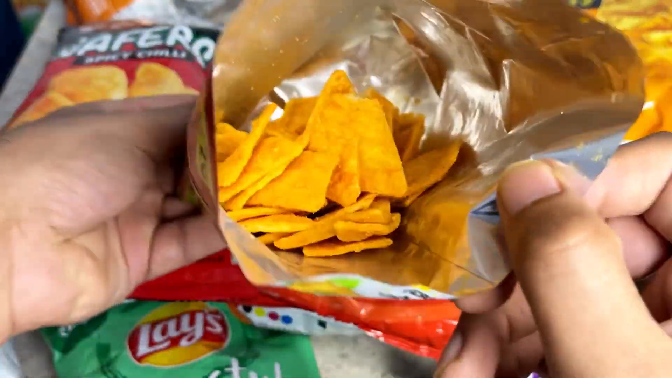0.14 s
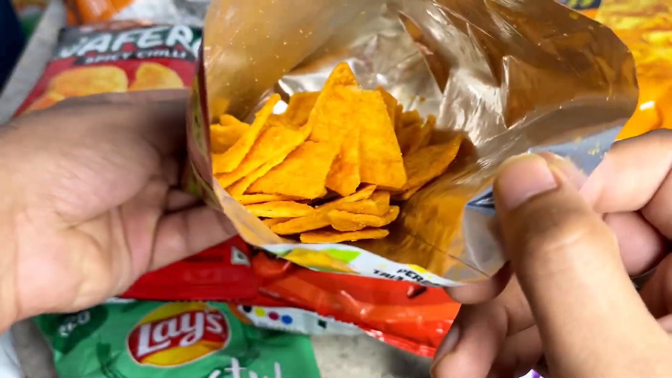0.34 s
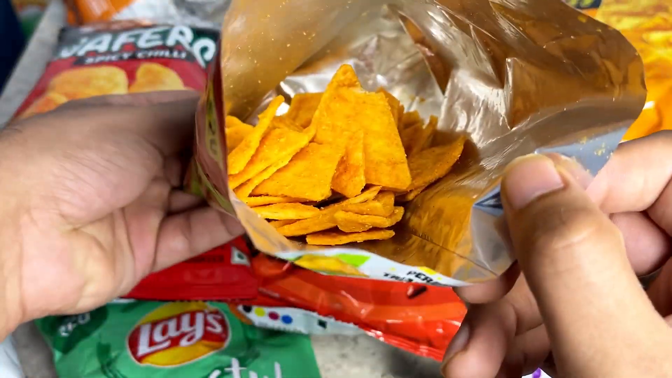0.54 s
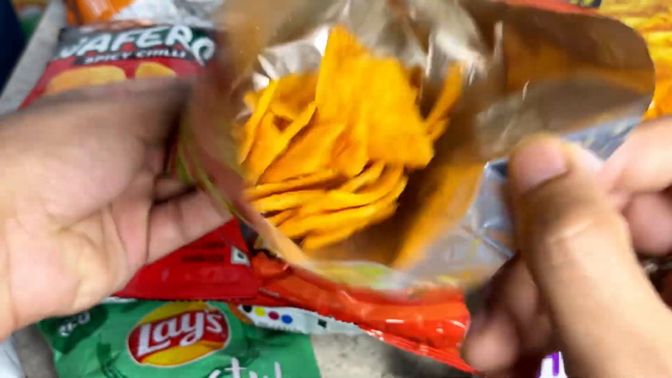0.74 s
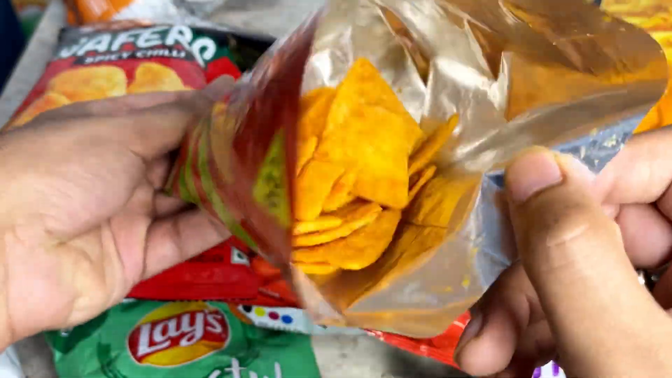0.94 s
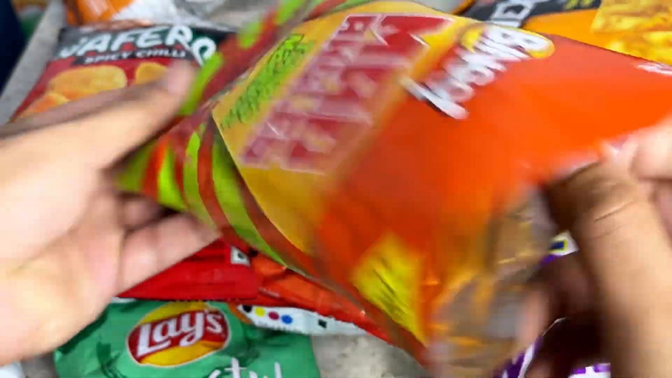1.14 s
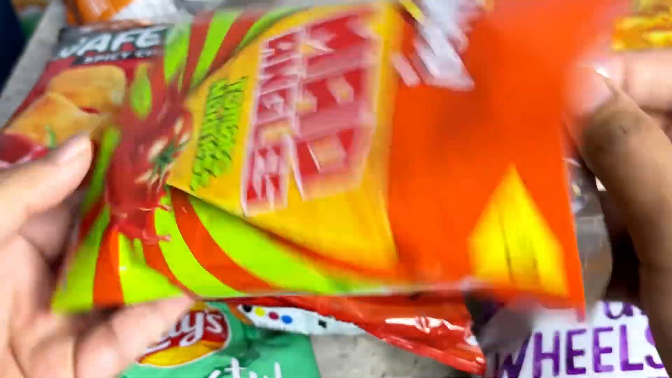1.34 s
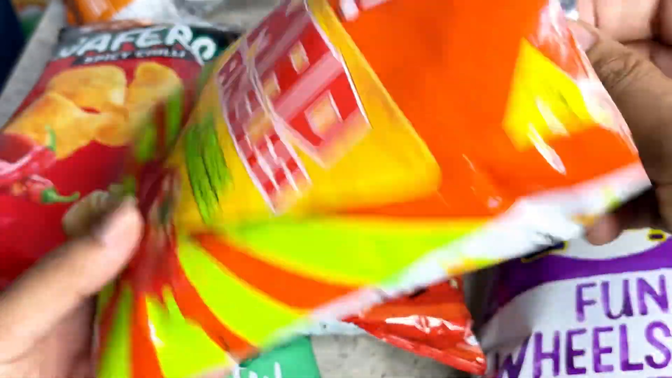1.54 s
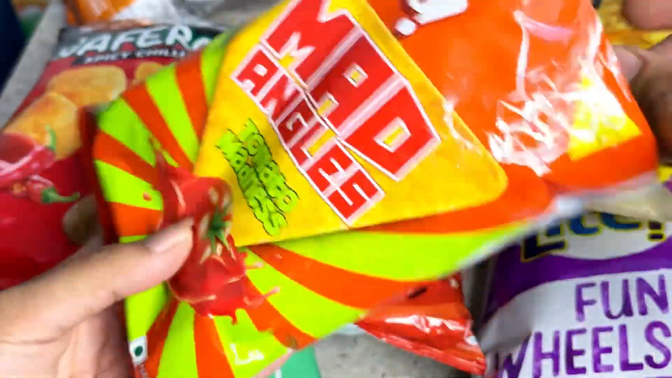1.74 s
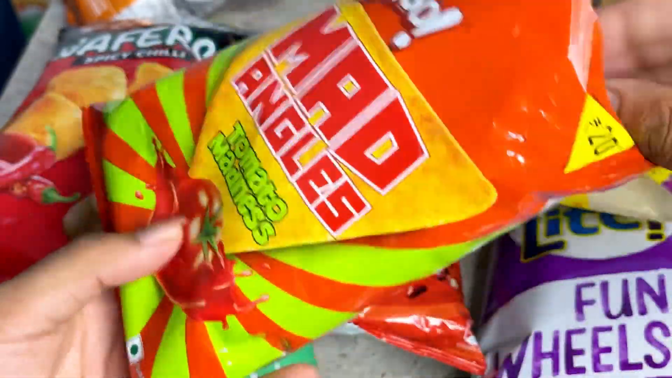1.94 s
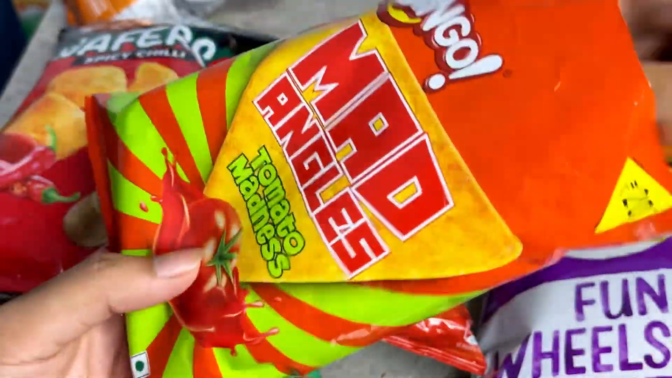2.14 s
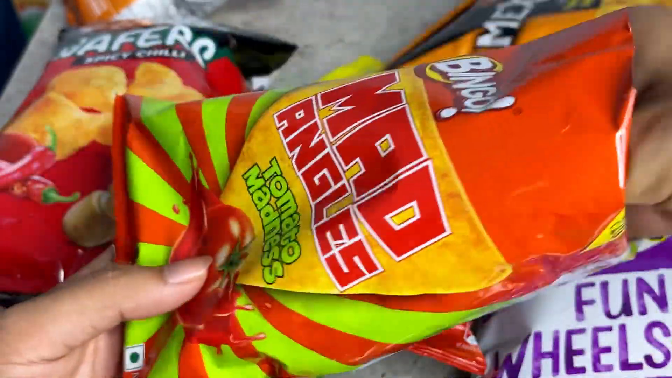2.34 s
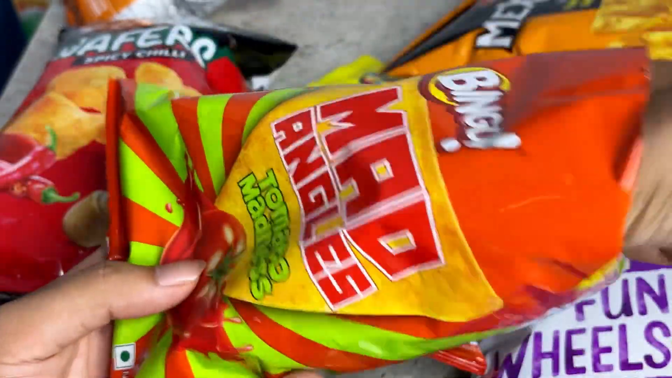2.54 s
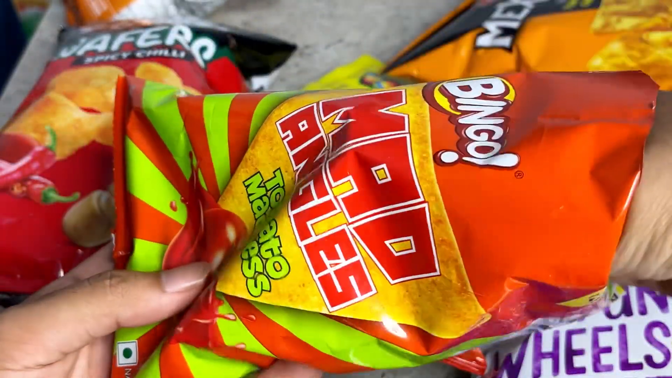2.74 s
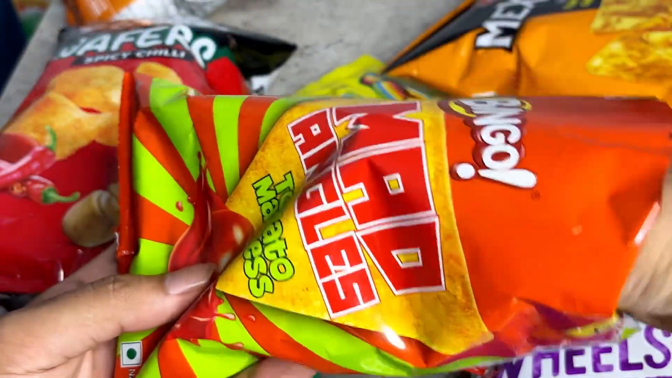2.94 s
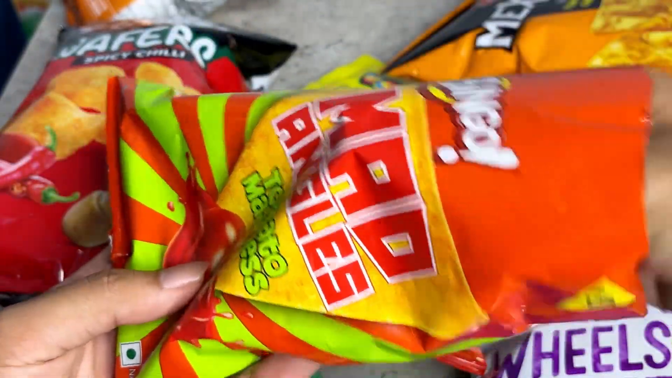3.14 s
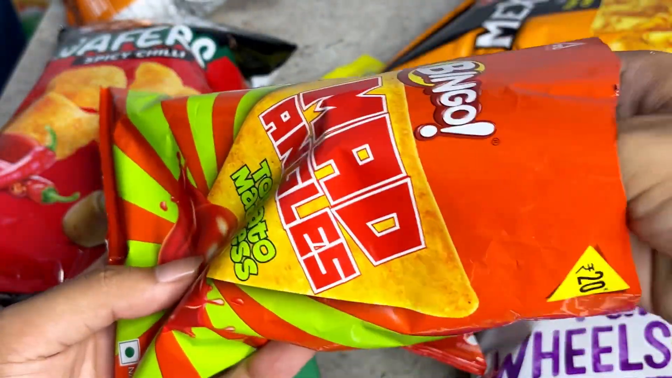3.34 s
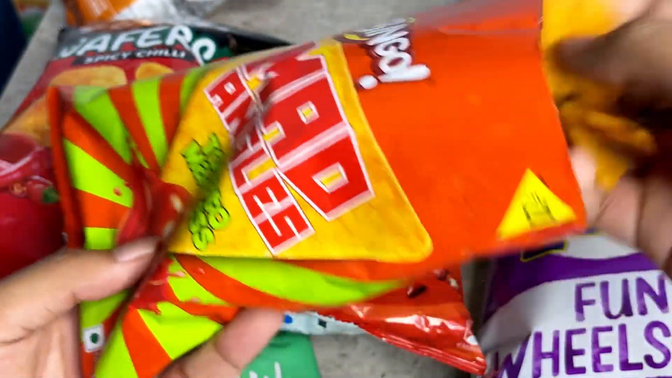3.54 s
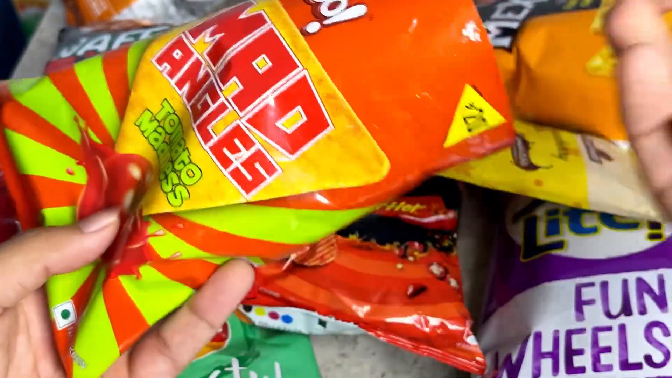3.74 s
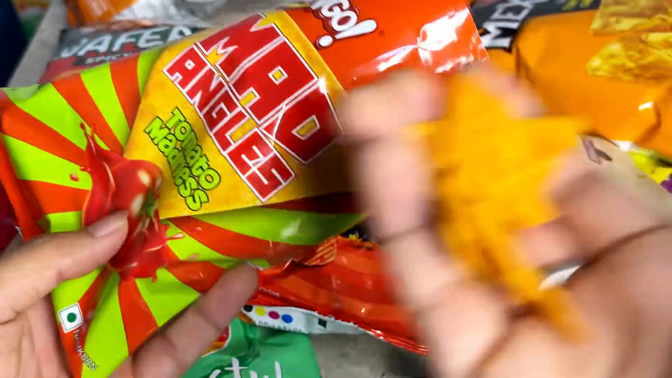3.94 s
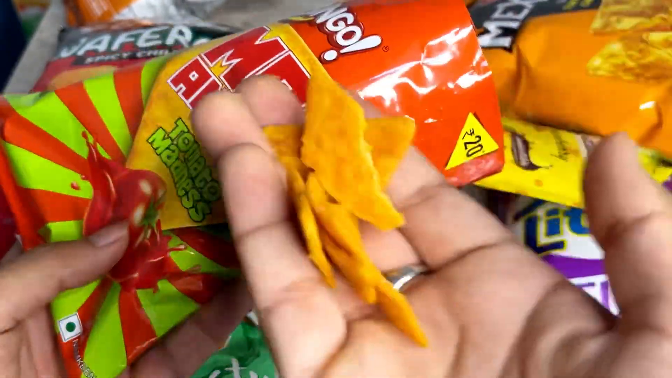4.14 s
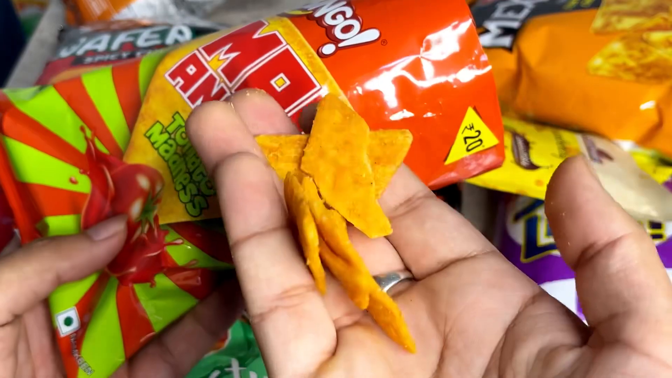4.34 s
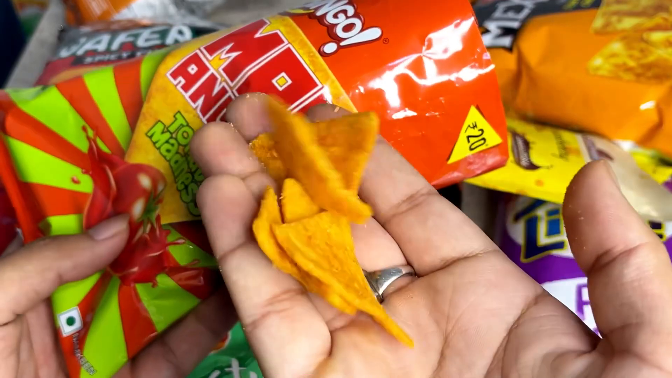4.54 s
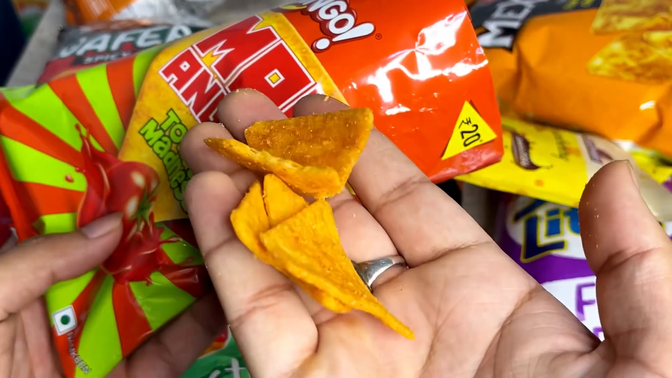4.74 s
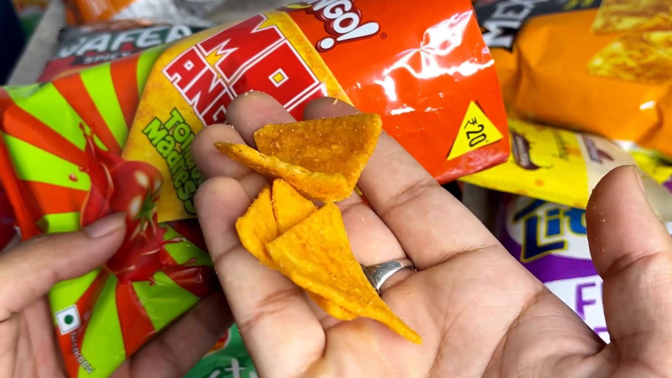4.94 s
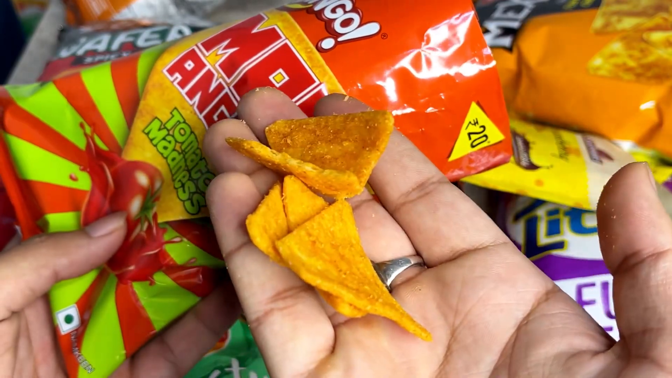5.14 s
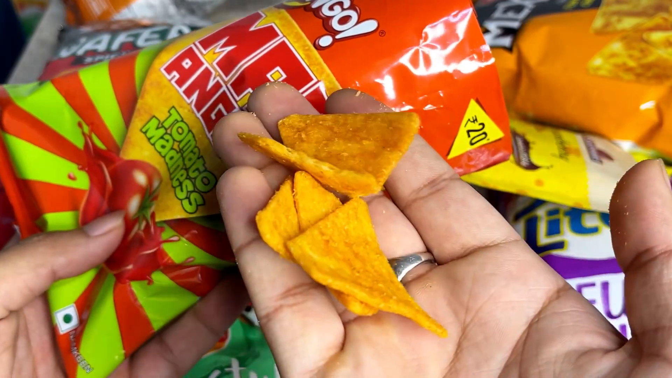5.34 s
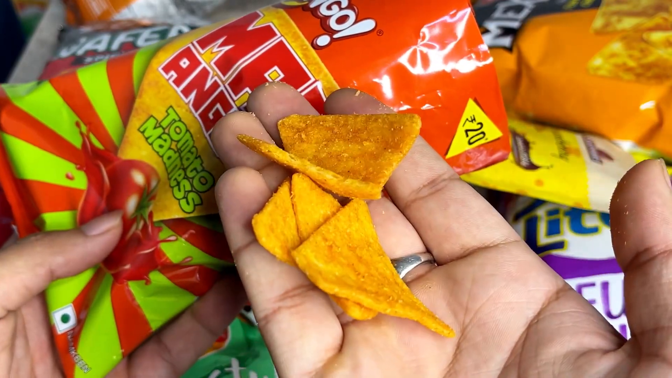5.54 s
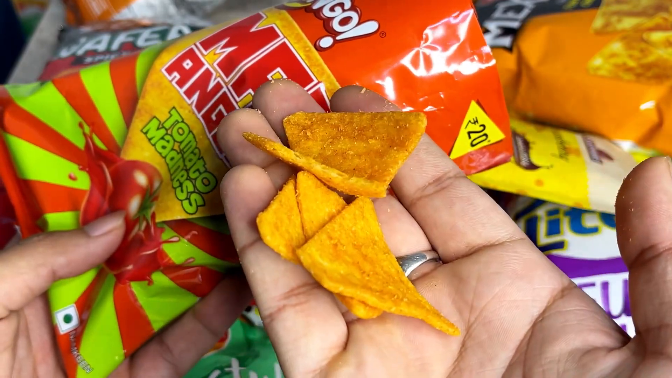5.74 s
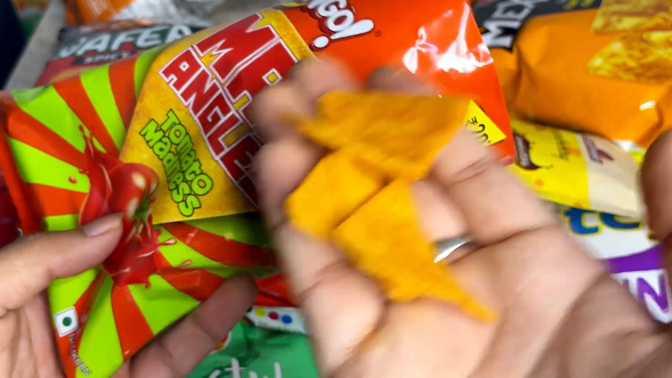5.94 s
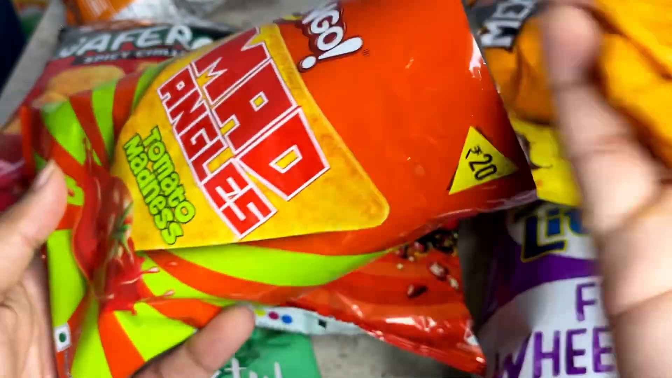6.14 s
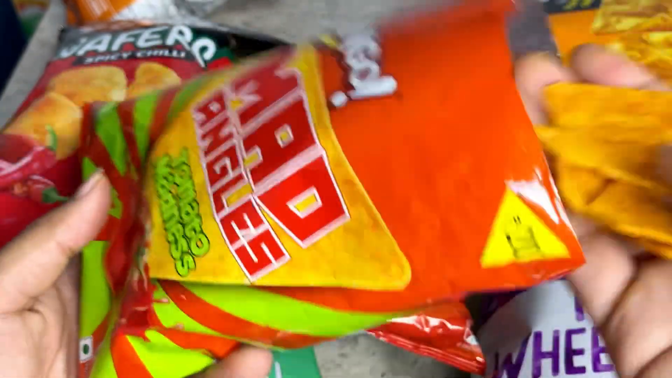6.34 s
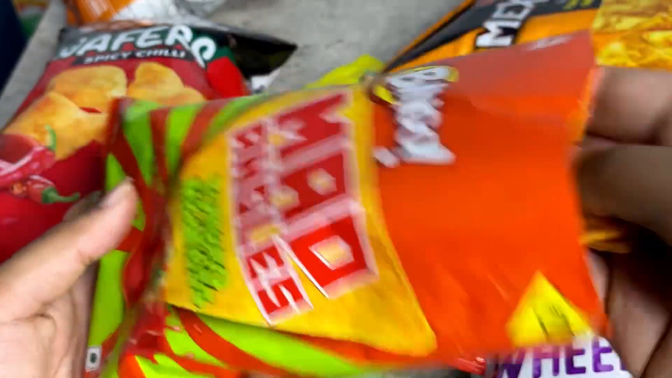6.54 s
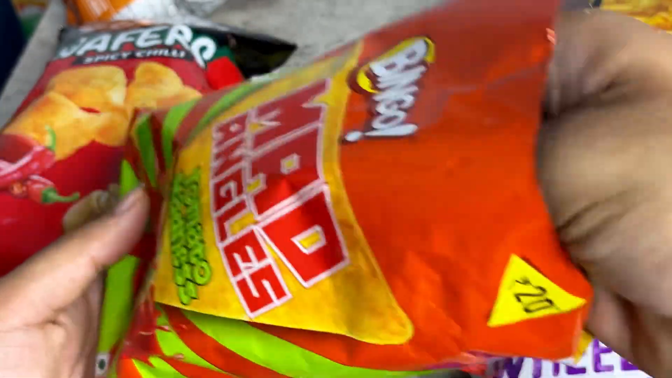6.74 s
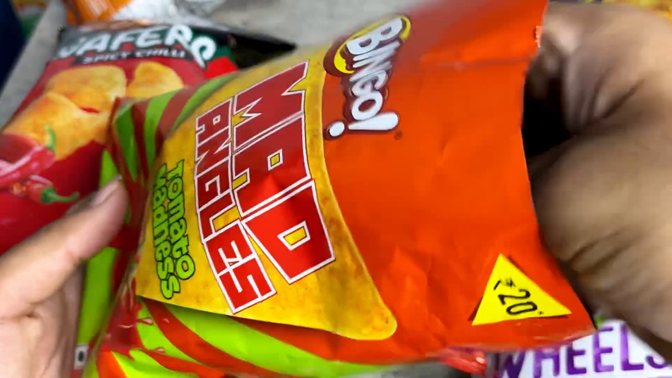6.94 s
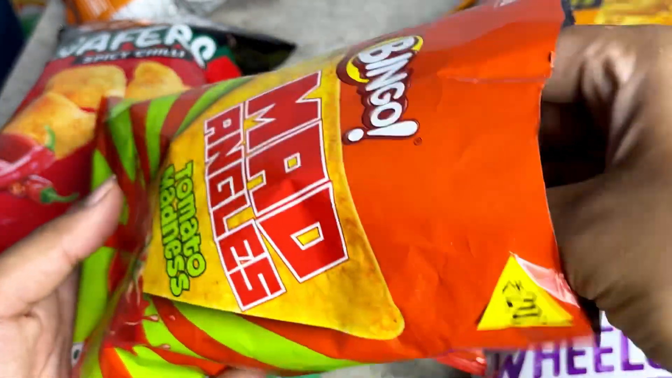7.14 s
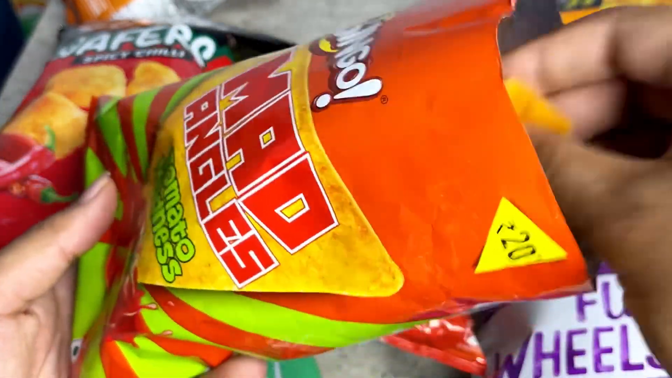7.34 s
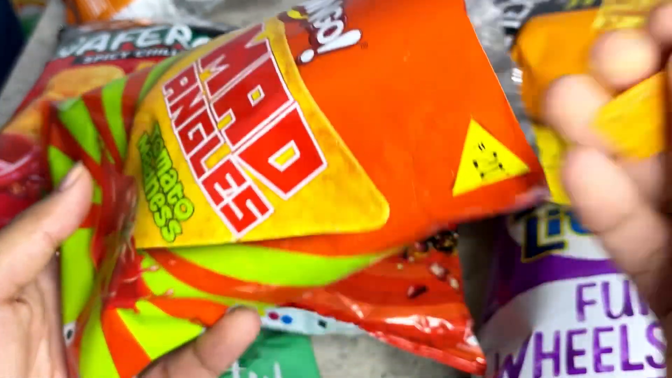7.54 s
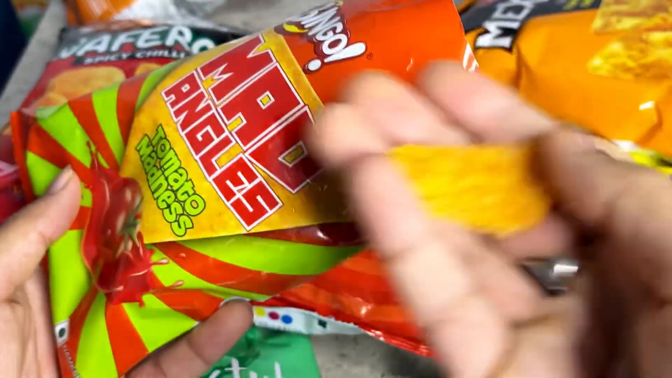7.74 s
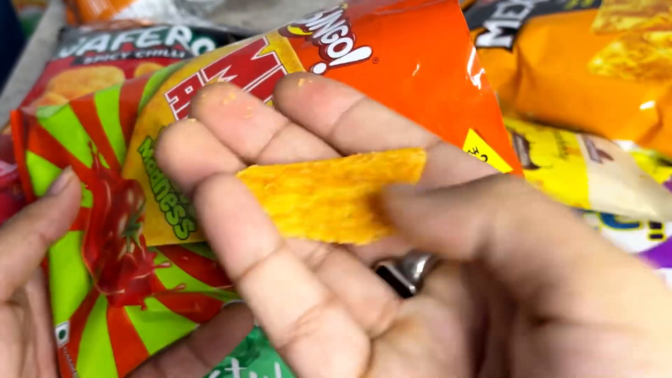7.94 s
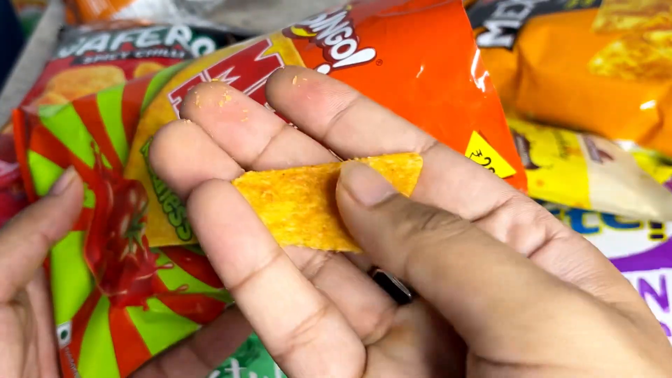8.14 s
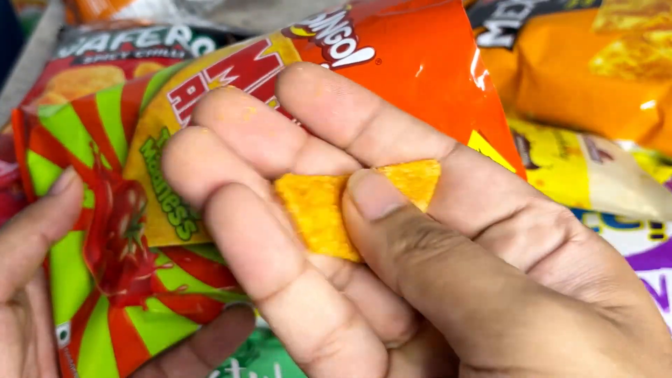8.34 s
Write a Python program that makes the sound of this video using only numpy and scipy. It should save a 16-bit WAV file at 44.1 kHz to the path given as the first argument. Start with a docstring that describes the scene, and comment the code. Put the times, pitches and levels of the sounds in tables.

```python
"""Fine film crackle over a low room rumble: a hand holds a foil-plastic snack packet open at the microphone,
shakes and turns it, reaches in twice and draws out crisps; late on, a crisp cracks under the thumb.
Creases are clicks ringing filtered modes; crackle is clustered grains over noise; puffs are short low sines.
Crisps slide as dense ticks, tap and crack brightly. A small room answers with decaying noise; a hum and a
dull hush lie behind. Two microphone ports hear it all with different phase and level."""
import sys
import numpy as np
from scipy import signal
from scipy.fft import rfft, irfft, next_fast_len
from scipy.io import wavfile
from scipy.ndimage import uniform_filter1d

SR = 44100
rng = np.random.default_rng(int(sys.argv[2]) if len(sys.argv) > 2 else 0)


def store_pcm(level_fs):
    """Save levels as 16-bit WAV."""
    pcm = np.round(np.clip(level_fs, -1, 1) * 32767).astype(np.int16)
    wavfile.write(sys.argv[1], SR, np.atleast_2d(pcm).T)


N = 374409

# background of the room, spectral shape: f/Hz, level/dB per Hz (relative)
RUMBLE_COLOUR = [(25, -21.5), (40, -2), (56, 4.5), (90, -2), (128, -4), (170, -18.5), (280, -16),
                 (450, -25), (800, -45.5), (1600, -44.5), (5000, -51.5), (15000, -60)]
# faint hum of a distant appliance: f/Hz, rms level/dB
HUM_TONES = [(129.2, -69), (226.1, -75.5)]
# a dull hush with a moving top edge: t/s, level/dB, top edge f/Hz
HUSH_COURSE = [(0.5, -64, 649), (3.6, -68, 2404), (4.35, -70, 2305), (4.85, -69.5, 1147),
               (5.149, -65.5, 550), (5.7, -82, 398), (7.5, -62.5, 800), (8.301, -65.5, 552)]
# colour of the film, spectral shape: f/Hz, level/dB per Hz (relative)
FILM_COLOUR = [(30, -17), (60, 0), (130, -5.5), (300, -3.5), (600, -3.5), (1100, -1.2), (1700, -4.5),
               (2250, -4), (2720, -3), (3800, -6.5), (5000, -6.5), (6400, -10), (10400, -13.5),
               (14000, -20.5), (16000, -26)]
# moves of the hand on the film: holding it open, shaking, turning it over, reaching in, drawing out,
# reaching in again, drawing out: t/s, length/s, level/dB, brightness/dB (before the register trims)
HAND_MOVES = [(0, 0.0029, -44.5, -0.5), (0.091, 0.063, -61, -3.5), (0.241, 0.0081, -56, -7.5),
              (0.588, 0.022, -56, -7.5), (0.62, 0.137, -40, -3), (0.762, 0.052, -36, -2),
              (0.904, 0.073, -58, -2.5), (1.042, 0.068, -57, -9), (1.123, 0.11, -49, -7),
              (1.254, 0.056, -50, -5.5), (1.342, 0.36, -43.5, -6), (1.725, 0.13, -46.5, -10),
              (1.861, 0.13, -41.5, -7.5), (2.02, 0.08, -50, -12.5), (2.172, 0.058, -29.5, -9),
              (2.261, 0.17, -40, -5), (2.471, 0.033, -31.5, -8), (2.537, 0.13, -44, -7.5),
              (2.691, 0.13, -41, -6.5), (2.865, 0.26, -49, -4.5), (3.15, 0.0098, -35.5, -4),
              (3.276, 0.3, -58.5, 3), (3.623, 0.1, -73.5, 4.5), (3.766, 0.012, -64, 15.5),
              (5.968, 0.016, -46.5, -15.5), (6.133, 0.051, -51.5, -8.5), (6.29, 0.17, -51.5, -5),
              (6.48, 0.056, -55, 2), (6.539, 0.16, -39.5, -6.5), (6.748, 0.039, -56.5, 1),
              (6.831, 0.012, -35.5, -8.5), (6.918, 0.014, -38, -8.5), (7.136, 0.082, -51, -6),
              (7.271, 0.063, -51.5, -1), (7.478, 0.12, -80, 17), (7.66, 0.066, -66.5, -0.5),
              (8.121, 0.039, -71.5, 1)]
# creases that buckle, and in the last row (8.116 s) a crisp that taps: t/s, level/dB, brightness/dB (before the
# register trims), panel f/Hz, facet f/Hz
CREASE_SNAPS = [(0.0363, -48, -3, 1460, 2644), (0.1253, -47.5, -26.5, 776, 1790),
                (0.2694, -47, -14, 898, 2650), (0.5916, -51.5, -11, 899, 2628),
                (0.621, -30.5, -6, 1410, 2297), (0.719, -28.5, 3, 1460, 2618),
                (0.7952, -31, -1.5, 734.3, 2576), (0.8127, -33, 4.5, 1157, 3290),
                (0.8333, -32.5, -10.5, 680, 2877), (1.0763, -41, -10, 1463, 1639),
                (1.1203, -45.5, -10, 1020, 2740), (1.141, -43, -13, 1101, 2760),
                (1.1851, -34.5, -12, 567.5, 2733), (1.2198, -40, 3.5, 840, 1714),
                (1.2355, -38.5, -1.5, 810, 4770), (1.2568, -27.5, 6.5, 900, 3208),
                (1.2662, -34, 5, 940, 4900), (1.3189, -34.5, -10.5, 1130, 1984),
                (1.328, -38.5, -12, 799, 2590), (1.3852, -32, -1, 970, 3324),
                (1.4529, -34, 3.5, 1080, 2400), (1.4901, -36, -1.5, 450, 2673),
                (1.5263, -35.5, -3, 880, 2855), (1.5622, -32.5, -14, 839.7, 1582),
                (1.5979, -31.5, -1, 925.6, 2803), (1.6449, -37, 3, 619.7, 4531),
                (1.6824, -38, -12, 1110, 2421), (1.7143, -36, -23, 820, 1541),
                (1.756, -38, -17.5, 1080, 2660), (1.8154, -37, -19.5, 940.4, 3304),
                (1.897, -27.5, -6.5, 1159, 3198), (1.9, -27.5, -8.5, 1191, 4660),
                (1.9637, -33, -16.5, 999, 3100), (1.9785, -35, -14.5, 910, 2900),
                (1.9879, -32.5, -10, 1050, 3430), (2.053, -37, -9.5, 1162, 3220),
                (2.1865, -26, -7, 1240, 3303), (2.2031, -22, -8.5, 1111, 2509),
                (2.2298, -24.5, -7, 1140, 1829), (2.2546, -28.5, -3.5, 1130, 3061),
                (2.294, -28.5, -10, 1280, 3260), (2.312, -33, -10.5, 1060, 3370),
                (2.3537, -27.5, -3, 809, 2670), (2.3891, -26, -1, 1000, 2970),
                (2.4128, -26, -4, 1450, 1980), (2.4454, -26, -1.5, 920, 2701),
                (2.4995, -27.5, -9, 1000, 2559), (2.5128, -30, -2, 1051, 2710),
                (2.5369, -33, -1, 870, 4430), (2.5525, -33.5, -14, 1180, 2681),
                (2.5631, -31, -11, 1180, 1616), (2.5765, -29, 4.5, 1440, 2020),
                (2.6143, -32, 0, 1100, 4900), (2.6271, -30.5, -7, 1058, 2670),
                (2.6565, -25, 0.5, 1070, 2730), (2.6605, -27, -3, 1220, 2730),
                (2.7129, -33.5, -2.5, 755, 2495), (2.7351, -33.0, -6.5, 940.4, 2680),
                (2.7937, -36, 2.5, 1140, 2599), (2.8128, -34.5, -8, 1160, 2182),
                (2.8198, -34.5, 3.5, 1050, 2702), (2.8645, -31, 0.5, 841, 2660),
                (2.9099, -34.5, -8.5, 780, 3030), (2.9375, -38.5, -16.5, 1050, 2100),
                (3.0695, -39.5, -28.5, 851, 2693), (3.1062, -32, -2.5, 1039, 3057),
                (3.1686, -30.5, -7, 1020, 2698), (3.1925, -25, -1.5, 1160, 2630),
                (3.2047, -34.5, -6.5, 1019, 2704), (3.3191, -40, 2.5, 1109, 2346),
                (3.3516, -40.5, -21, 1139, 2680), (3.6486, -58.5, 8.5, 1039, 2607),
                (3.7529, -39.5, 9.5, 1054, 2820), (5.9745, -42.5, -22.5, 450, 1838),
                (6.0812, -39.5, -7.5, 1031, 2604), (6.1205, -33.5, -18, 1029, 2700),
                (6.156, -40.5, -27, 960, 2990), (6.164, -45, -14, 1030, 2650),
                (6.2375, -56, -6, 1030, 2114), (6.3025, -37, -6.5, 1069, 2970),
                (6.3225, -30.5, -3, 919, 3980), (6.3541, -30.5, -6.5, 1030, 4354),
                (6.3752, -33, 2.5, 791, 2459), (6.3922, -37.5, -10, 1121, 2615),
                (6.4131, -37, -3, 1270, 2400), (6.5614, -25.5, -6.5, 1221, 2368),
                (6.5847, -33, -5.5, 1020, 2710), (6.6174, -38, -20, 815.6, 2350),
                (6.6383, -25, -13.5, 951.5, 2600), (6.6485, -28.5, -10, 955, 2531),
                (6.6725, -28.5, 0.5, 938.7, 2450), (6.833, -26.5, -6, 763, 2480),
                (6.8486, -29.5, -8, 750, 2830), (6.9236, -30, -15.5, 1101, 3104),
                (6.9335, -30, -15, 990.5, 1529), (6.9405, -32.5, -16, 720.2, 2400),
                (7.1195, -49.5, -16, 1190, 1720), (7.1445, -33.5, 4, 1031, 2060),
                (7.2106, -39.5, 1, 1050, 2678), (7.294, -33.5, -17, 951, 2540),
                (7.388, -50.5, -40, 1017, 1501), (7.531, -63.5, -29, 699, 3287),
                (7.6646, -54.5, -11, 1060, 1976), (7.715, -57, -9, 1130, 2775),
                (8.1163, -45, -7.5, 1098, 3460)]
# slack panels boom, panels stretched by the hand sound thin: t/s, low shelf level/dB
PANEL_SLACK = [(0.8, 5.5), (1.5, 3.5), (2.3, -1.5), (2.8, 2.5), (3.25, 1.5), (3.8, 13), (6.1, 3.5),
               (6.8, -1), (7.5, 9.5)]
# pushes that make the packet bulge: t/s, level/dB (before the common puff level)
AIR_PUFFS = [(0.701, -28), (0.789, -30.5), (0.829, -27.5), (1.068, -31.5), (1.16, -36.5), (1.83, -33),
             (1.888, -38.5), (2.216, -29), (2.568, -38), (3.19, -36), (6.65, -38), (6.857, -31.5)]
# crisps sliding on each other in the palm: t/s, length/s, level/dB
PALM_RUBS = [(3.918, 0.072, -62.5), (4.144, 0.098, -70), (4.405, 0.12, -68.5), (4.562, 0.096, -72),
             (5.31, 0.048, -70), (8.17, 0.18, -70)]
# crisps ticking in the palm, and one breaking under the thumb: t/s, level/dB
BRITTLE_CRACKS = [(3.95, -60), (4.021, -61.5), (4.197, -57), (4.227, -61), (4.238, -56), (5.385, -65),
                  (8.169, -58), (8.185, -57.5), (8.308, -47), (8.3124, -33), (8.3137, -22.5), (8.3159, -26),
                  (8.339, -43.5), (8.3621, -45), (8.449, -60.5)]
# colour of the breaking crisp, spectral shape: f/Hz, level/dB per Hz (relative)
CRISP_COLOUR = [(450, -19), (1050, -27), (2000, -20), (2700, -10), (4300, -5), (4800, 0), (5500, -2),
                (6300, -12), (7900, -6), (9700, -7), (10400, -3), (12300, -13), (16000, -15)]
# a crisp topples over in the palm with a dull tap:
# t/s, level/dB, brightness/dB (before the register trims), low ring f/Hz, high ring f/Hz
PALM_TAPS = [(4.287, -63.5, -49, 1052, 2015), (4.7335, -47.5, -32, 1120, 1670)]
# the two microphone ports, phase by which left leads right: f/Hz, lead/rad
PORT_LEAD = [(100, -.1), (1350, -.3), (2050, .5), (2900, -.4), (4950, -.1), (5350, 2.2), (6350, 2.3),
             (6950, 3.1), (7800, 5.7), (9400, 6.4), (12300, 9.3), (13400, 9.8), (15600, 12.2)]
# the two microphone ports, left minus right: f/Hz, level/dB
PORT_LEVEL = [(60, -1.3), (1100, -1.7), (2000, -3.2), (2650, 3.2), (3600, -0.5), (15000, 0.2)]

RUMBLE_DB = -55.5
BODY_TOP_HZ, EDGE_FROM_HZ = 1500, 5000
SNAP_SIZE = 2048   # samples in one buckle
MOVE_ATTACK_S, MOVE_RISE_DB_PER_S, MOVE_RELEASE_DB_PER_S = 0.019, 648, 209
SEESAW = 0.17   # share of the brightness that shifts from the body to the crack
# a ringing mode: bandwidth is a share of its pitch plus a fixed part; all but the first are weaker
RING_SHARE, RING_WIDTH_HZ, OTHER_MODES_DB = .015, 55, -4.5
RUB_TICKS_PER_S = 600
ROOM_T60_S, ROOM_DB, CRISP_ROOM_DB = 0.4, -14, -2.5
BASS_CUT_HZ, CUTOFF_HZ = 38, 16000


def from_db(db):
    """Decibels to gain."""
    return 10 ** (np.asarray(db) / 20)


def rms_one(x):
    """Scale to an rms of 1."""
    return x / np.sqrt(np.mean(x ** 2) + 1e-20)


def at_hz(points, hz):
    """Read a table on a log-frequency axis."""
    f, value = np.transpose(points)
    return np.interp(np.log(hz + 1e-3), np.log(f), value)


def bins(size):
    """Frequencies of a spectrum of this many samples."""
    return np.arange(size // 2 + 1) * SR / size


def low_pass(x, order, hz):
    """Keep what lies below a frequency."""
    return signal.sosfilt(signal.butter(order, hz, fs=SR, output="sos"), x)


def band_pass(x, edges_hz):
    """Keep what lies between two frequencies."""
    return signal.sosfilt(signal.butter(2, edges_hz, "band", fs=SR, output="sos"), x)


def causal(gain):
    """The minimum-phase filter with these gains: nothing sounds early."""
    cepstrum = irfft(np.log(gain + 1e-6))
    cepstrum[1:SNAP_SIZE // 2] *= 2
    cepstrum[SNAP_SIZE // 2 + 1:] = 0
    return np.exp(rfft(cepstrum))


def stereo_noise(width, size):
    """Two noises that differ by a side part of this width."""
    mid, side = rng.standard_normal((2, size))
    return np.array([mid + width * side, mid - width * side])


def add(out, wave, s):
    """Mix a stereo wave in at a time."""
    i = max(round(s * SR), 0)
    out[:, i:i + SNAP_SIZE] += wave[:, :N - i]


def rumble():
    """Steady low noise of the room, nearly alike on both sides."""
    size = next_fast_len(N, True)
    spectrum = rfft(stereo_noise(0.13, size=size))
    noise = irfft(spectrum * from_db(at_hz(RUMBLE_COLOUR, bins(size))), size)
    return from_db(RUMBLE_DB) * rms_one(noise[:, :N])


def hum():
    """Two steady low sine tones, as from a distant appliance."""
    t = np.arange(N) / SR
    out = np.zeros(N)
    for hz, level_db in HUM_TONES:
        tone = np.sin(2 * np.pi * (hz * t + rng.random()))
        out += from_db(level_db) * np.sqrt(2) * tone   # a sine's peak is root 2 above its rms
    return out


def hush(slope_db_per_octave, count=9):
    """Faint noise in narrow bands; those above the moving top edge fade away."""
    s, level_db, top_hz = np.transpose(HUSH_COURSE)
    t = np.arange(N) / SR
    top = np.interp(t, s, top_hz)
    out = np.zeros((2, N))
    edges = np.geomspace(300, 2800, count + 1)
    for low, high in zip(edges, edges[1:]):
        band = rms_one(band_pass(stereo_noise(0.71, size=N), [low, high]))
        tilt = from_db(slope_db_per_octave * np.log2(low / edges[0]))
        out += band * tilt / (1 + (low / top) ** 10)
    return out / np.sqrt(count) * from_db(np.interp(t, s, level_db))


def film_registers():
    """The film's colour split into body (whole panels), crack (creases) and edge (crease tips)."""
    hz = bins(SNAP_SIZE)
    under_body = 1 / (1 + (hz / BODY_TOP_HZ) ** 10)
    under_edge = 1 / (1 + (hz / EDGE_FROM_HZ) ** 10)
    shares = [under_body, (1 - under_body) * under_edge, 1 - under_edge]
    return [causal(from_db(at_hz(FILM_COLOUR, hz)) * np.sqrt(share)) for share in shares]


def register_levels(level_db, brightness_db):
    """Levels of body, crack and edge for one level and brightness."""
    return level_db + np.array([-SEESAW, SEESAW, 1]) * brightness_db


def stroke(s, length_s):
    """Gain of one move: it swells to full force just after its start, holds and dies away."""
    t = np.arange(N) / SR - s
    rise_db = MOVE_RISE_DB_PER_S * np.clip(MOVE_ATTACK_S - t, 0, 1)
    release_db = MOVE_RELEASE_DB_PER_S * np.clip(t - length_s, 0, 1)
    return from_db(-rise_db - release_db)


def effort():
    """How hard the hand works body, crack and edge, in dB: the powers of all moves add up."""
    power = np.full((3, N), 1e-12)
    for s, length_s, level_db, brightness_db in HAND_MOVES:
        gains = from_db(register_levels(level_db, brightness_db))
        power += np.outer(gains ** 2, stroke(s, length_s) ** 2)
    return 10 * np.log10(power)


def buckle(register, decay_s, rise_s, ring_db, width, ring_hz=None, count=3):
    """One sudden flip or crack, of unit energy: a click rings a few modes and scatters in the sheet."""
    t, hz = np.arange(SNAP_SIZE) / SR, bins(SNAP_SIZE)
    noise = stereo_noise(width, size=SNAP_SIZE)
    burst = noise * (1 - np.exp(-t / rise_s)) ** 2 * np.exp(-t / decay_s)
    scatter = rfft(rms_one(burst)) / np.sqrt(SNAP_SIZE)
    # bending waves are dispersive: the travel time (given at 1 kHz) falls with the root of frequency
    travel_s = rng.uniform(.0006, .0018)
    click = np.exp(-4j * np.pi * travel_s * np.sqrt(1000 * hz))
    # modes of no given pitch lie anywhere in the register
    share = np.cumsum(np.abs(register))
    modes_hz = np.interp(rng.random(count), share / share[-1], hz)
    gains = from_db(OTHER_MODES_DB) * rng.choice([-1, 1], count)
    modes_hz[0], gains[0] = ring_hz or modes_hz[0], 1
    modes = 0
    for f, gain in zip(modes_hz, gains):
        modes = modes + gain / (1 + 1j * (hz - f) / (RING_SHARE * f + RING_WIDTH_HZ))
    wave = irfft((click * (1 + from_db(ring_db) * modes) + scatter) * register)
    return rms_one(wave) / np.sqrt(SNAP_SIZE)


def crackle(registers, effort_db, per_s, count=96):
    """Small wrinkles of many sizes flip in clusters, over the smooth rub of skin and crisps on the film."""
    t = np.arange(N) / SR
    times = rng.uniform(0, N / SR, int(per_s * N / SR))
    # a gentle move flips few wrinkles, a hard crush all of them
    flipping = np.interp(np.interp(times, t, effort_db[1]), [-54, -37], [.35, 1])
    times = times[rng.random(len(times)) < flipping]
    # slowly wandering stress groups the big flips into clusters
    slips_s = np.arange(0, N / SR, .014)
    stress_db = 2.5 * np.interp(times, slips_s, rng.standard_normal(len(slips_s)))
    sizes_db = stress_db + 3.5 * np.minimum(rng.exponential(1, len(times)), 2.5)
    # a light touch mostly rubs; a firm one makes the wrinkles stand out
    firmness = from_db(np.interp(effort_db[1], [-75, -52], [-5, 0]))
    rubs_db, decays_s, trims_db = [-8, -11, -6.5], [.0022, .0014, .001], [-1.5, 0.6, -0.6]
    out = np.zeros((2, N))
    for register, level_db, rub_db, decay_s, trim_db in zip(registers, effort_db, rubs_db, decays_s, trims_db):
        wrinkles = [buckle(register, decay_s, rise_s=.0003, ring_db=15, width=.35) for _ in range(count)]
        sizes = from_db(sizes_db + rng.uniform(-6, 6, len(times)))
        grains = np.zeros((2, N))
        for k, (when, size) in enumerate(zip(times, sizes)):
            add(grains, size * wrinkles[k % count], when)
        rub = signal.oaconvolve(stereo_noise(0.15, size=N), irfft(register)[None], axes=1)[:, :N]
        mix = firmness * rms_one(grains) + from_db(rub_db) * rms_one(rub)
        # level out the power over 35 ms, so that the hand sets it
        power = uniform_filter1d(np.mean(mix ** 2, axis=0), int(.035 * SR))
        out += mix / np.sqrt(power + 1e-9) * from_db(level_db + trim_db)
    return out


def snaps(registers, creases):
    """Flips one by one, each with its own pitches; the body's scatter lasts longest, the edge's dies first."""
    out = np.zeros((2, N))
    decays_s, rings_db, trims_db = [.0034, .0027, .0015], [13, 15.5, 12], [-2.3, 2.2, 0]
    for s, level_db, brightness_db, panel_hz, facet_hz in creases:
        levels_db = register_levels(level_db, brightness_db) + trims_db
        pitches_hz = (panel_hz, facet_hz, None)
        for register, decay_s, ring_db, hz, db in zip(registers, decays_s, rings_db, pitches_hz, levels_db):
            wave = buckle(register, decay_s, rise_s=0.00029, ring_db=ring_db, width=0.17, ring_hz=hz)
            add(out, wave * from_db(db) * np.sqrt(0.0035 * SR), s)   # levels are rms over 3.5 ms
    return out


def panels(x, shelf_hz):
    """The slacker the packet, the more its wide panels radiate the low notes."""
    s, slack_db = np.transpose(PANEL_SLACK)
    boost = from_db(np.interp(np.arange(N) / SR, s, slack_db)) - 1
    return x + boost * low_pass(x, 1, shelf_hz)


def puffs(hz, swell_s, level_db):
    """Each push moves the air in the packet: a soft low thump, a swelling sine with a little noise."""
    out, t = np.zeros(N), np.arange(N // 40) / SR
    swell = t / swell_s * np.exp(1 - t / swell_s)
    for s, puff_db in AIR_PUFFS:
        pitch = hz * np.exp(rng.normal(0, 0.22))
        flap = rms_one(band_pass(rng.standard_normal(len(t)), [90, 260]))
        wave = swell * (np.sin(2 * np.pi * pitch * t) + from_db(-14.0) * flap)
        i = round(s * SR)
        out[i:i + len(t)] += from_db(puff_db + level_db) * wave[:N - i]
    return out


def crisp_rubs(ring_hz, tilt_db, count=64):
    """Faces catch and slip on each other: a soft rustle of dense tiny ticks that ring near one pitch."""
    out, hz = np.zeros((2, N)), bins(SNAP_SIZE)
    tilt = tilt_db * np.log2(1 + hz / EDGE_FROM_HZ)
    colour = causal(from_db(at_hz(CRISP_COLOUR, hz) + tilt))
    force = sum(from_db(level_db) * stroke(s, length_s) for s, length_s, level_db in PALM_RUBS)
    ticks = []
    for _ in range(count):
        pitch = ring_hz * rng.uniform(.85, 1.15)
        ticks.append(buckle(colour, .002, rise_s=.0004, ring_db=3, width=.2, ring_hz=pitch))
    for k, (when, size) in enumerate(rng.random((int(RUB_TICKS_PER_S * N / SR), 2))):
        add(out, size ** 3 * ticks[k % count], when * N / SR)   # cubing makes most ticks tiny
    return rms_one(out) * force


def crisp_cracks(decay_s):
    """A thin brittle crisp has no body: its cracks are short and bright."""
    out = np.zeros((2, N))
    colour = causal(from_db(at_hz(CRISP_COLOUR, bins(SNAP_SIZE))))
    for s, level_db in BRITTLE_CRACKS:
        wave = buckle(colour, decay_s, rise_s=.0005, ring_db=-20, width=.2)
        add(out, wave * from_db(level_db) * np.sqrt(0.0048 * SR), s)   # levels are rms over 4.8 ms
    return out


def room(x, early_db, early_s, treble_t60_s, linger_db, linger_t60_s, linger_hz, width):
    """Table and nearby packets scatter at once; walls give a short tail; lower notes linger faintly."""
    t = np.arange(SR) / SR
    noise = stereo_noise(width, size=len(t))
    low = low_pass(noise, 1, 3000)
    tail = low * from_db(-60 * t / ROOM_T60_S) + (noise - low) * from_db(-60 * t / treble_t60_s)
    tail = rms_one(tail * (t > .005))
    early = rms_one(stereo_noise(width, size=len(t)) * np.exp(-t / early_s) * (t > .002))
    lower = low_pass(stereo_noise(width, size=len(t)), 4, linger_hz)
    linger = rms_one(lower * from_db(-60 * t / linger_t60_s))
    answer = from_db(ROOM_DB) * tail + from_db(early_db) * early + from_db(linger_db) * linger
    return signal.fftconvolve(x, answer / np.sqrt(len(t)), axes=1)[:, :N]


def scene():
    """The packet and crisps close by, their room, and the background."""
    registers, effort_db = film_registers(), effort()
    film = crackle(registers, effort_db, per_s=520) + snaps(registers, CREASE_SNAPS)
    packet = panels(film, shelf_hz=644)
    crisp = crisp_cracks(decay_s=0.0013) + crisp_rubs(ring_hz=4200, tilt_db=1.5) + snaps(registers, PALM_TAPS)
    air = puffs(hz=70.0, swell_s=0.008, level_db=-2.5)
    # the crisp is held closest to the microphone, so it sounds drier
    walls = room(packet + from_db(CRISP_ROOM_DB) * crisp, early_db=-9.5, early_s=0.0056, treble_t60_s=0.14,
                 linger_db=-37.5, linger_t60_s=1.3, linger_hz=1298, width=0.35)
    background = rumble() + hum() + hush(slope_db_per_octave=-0.5)
    return packet + crisp + walls + air + background


def record(dry):
    """Two ports hear the sound with different phase and level; the deep bass and the top are cut."""
    size = next_fast_len(N + SNAP_SIZE, True)
    hz = bins(size)
    # each port takes half the difference, in opposite directions
    lead = np.exp(.5j * at_hz(PORT_LEAD, hz)) * from_db(at_hz(PORT_LEVEL, hz) / 2)
    ports = irfft(rfft(dry, size) * np.array([lead, 1 / lead]), size)[:, :N]
    ports = signal.sosfilt(signal.butter(4, BASS_CUT_HZ, "high", fs=SR, output="sos"), ports)
    return signal.sosfilt(signal.ellip(10, .2, 70, CUTOFF_HZ, fs=SR, output="sos"), ports)


dry = scene()
out = record(dry)
store_pcm(out)
```